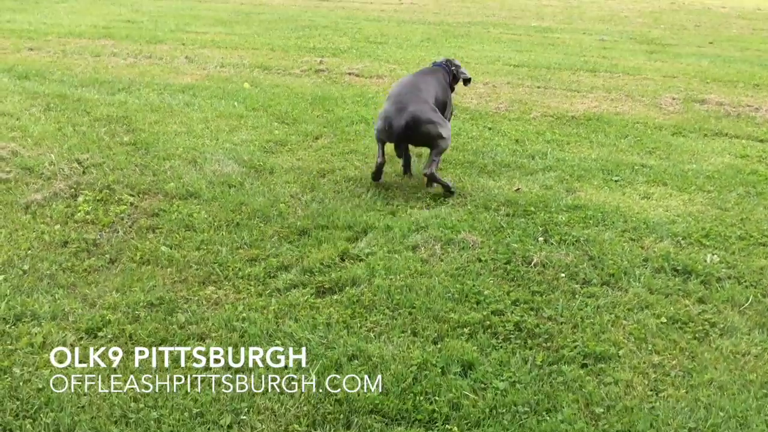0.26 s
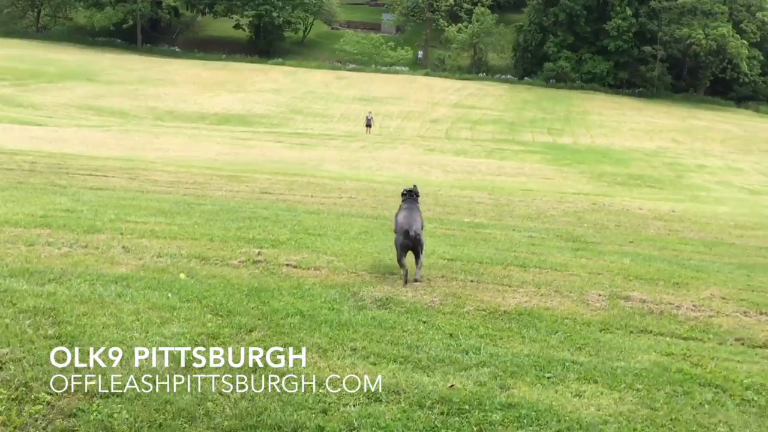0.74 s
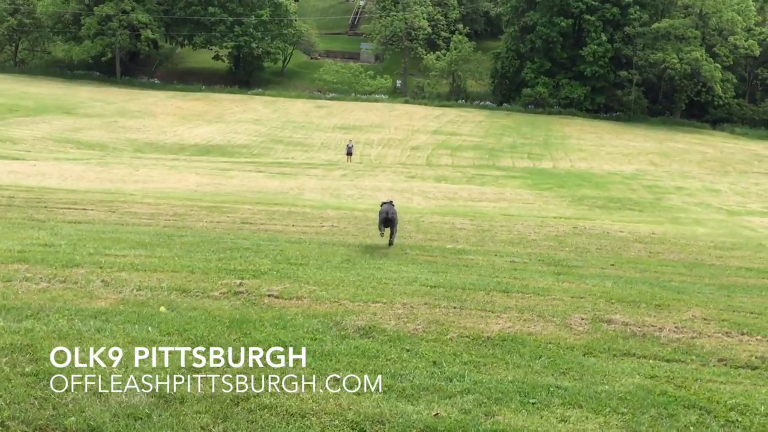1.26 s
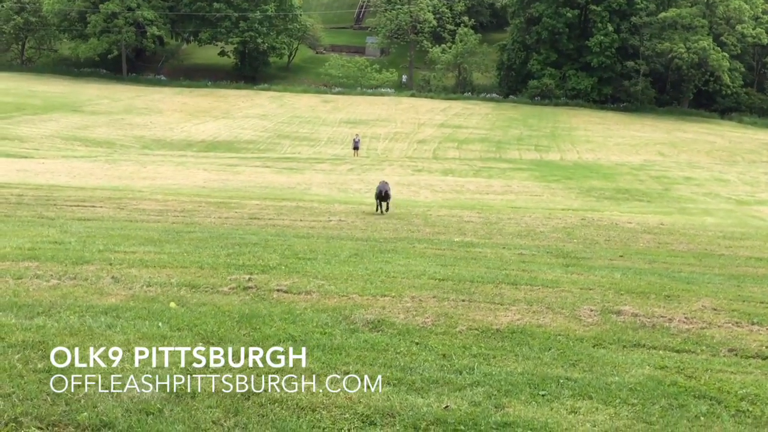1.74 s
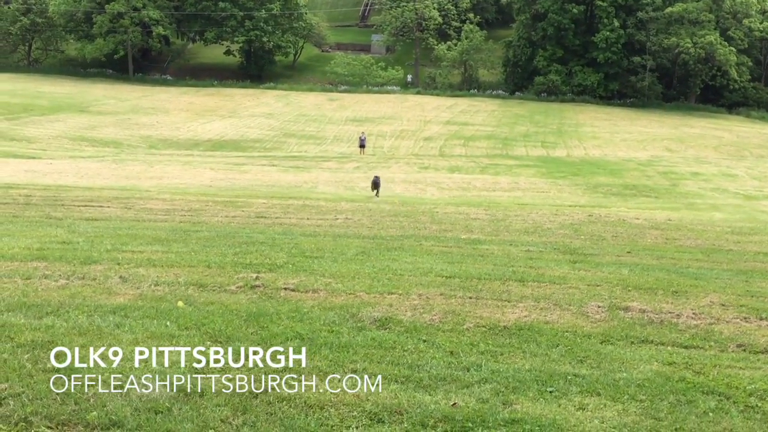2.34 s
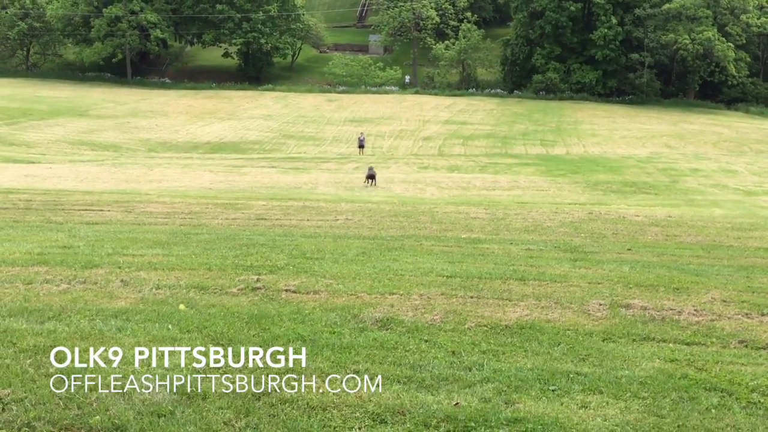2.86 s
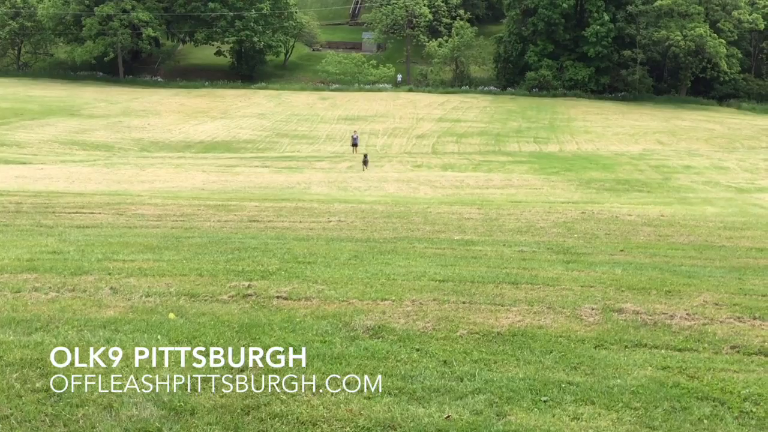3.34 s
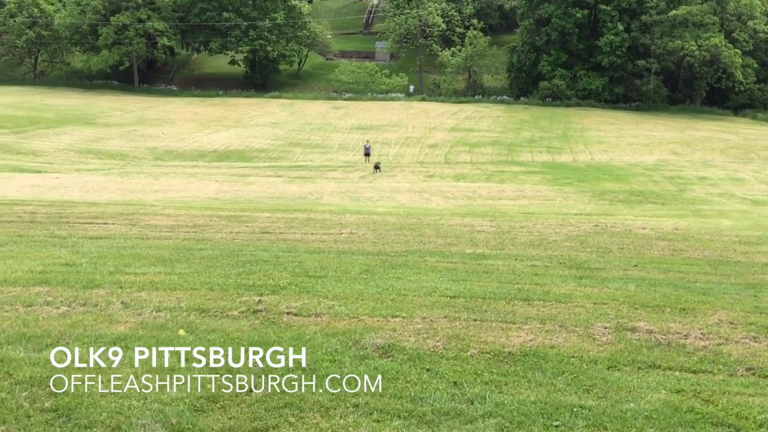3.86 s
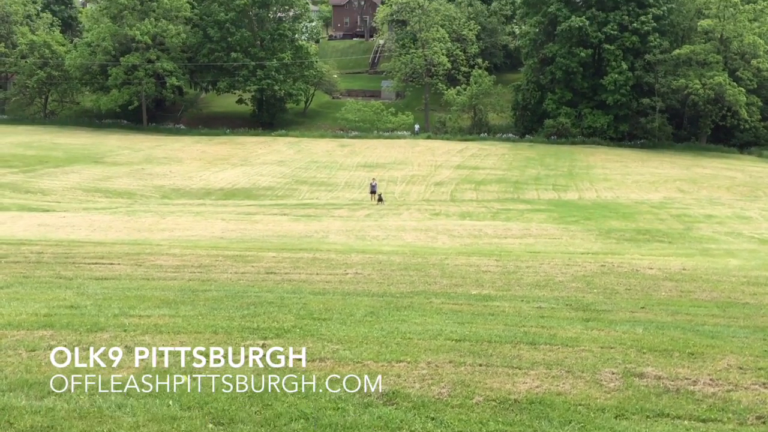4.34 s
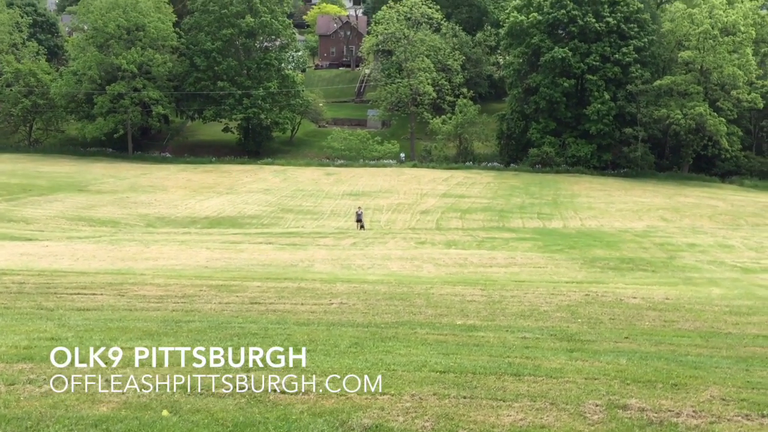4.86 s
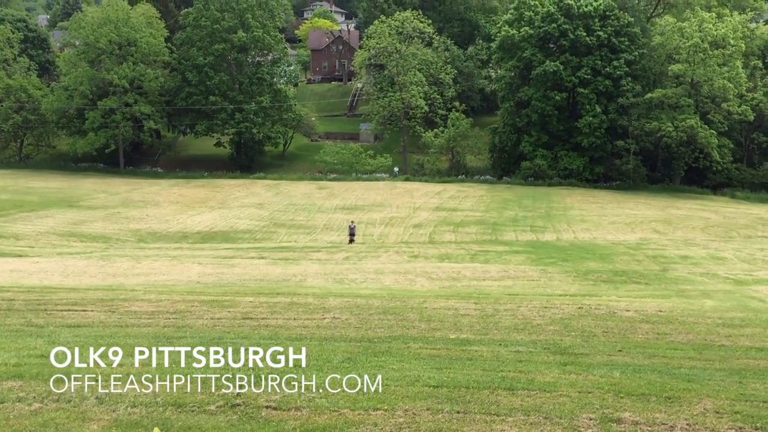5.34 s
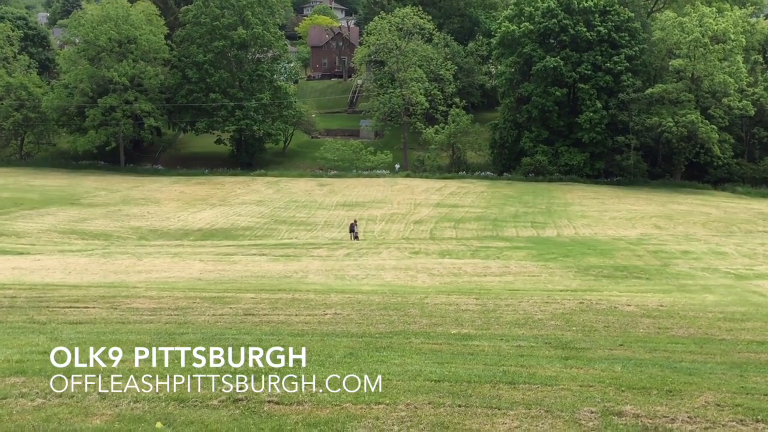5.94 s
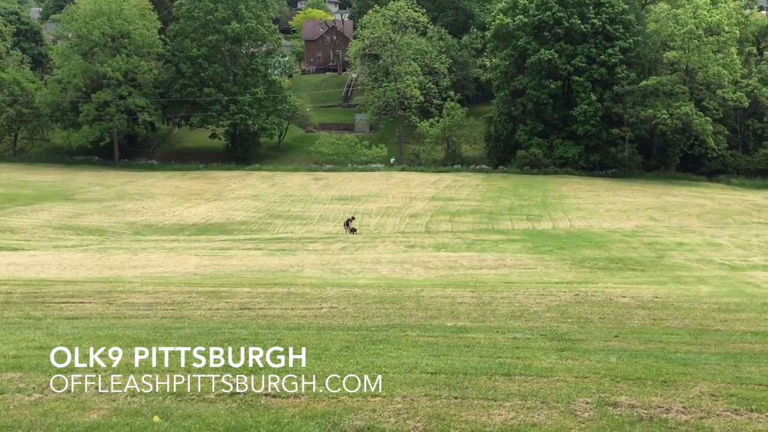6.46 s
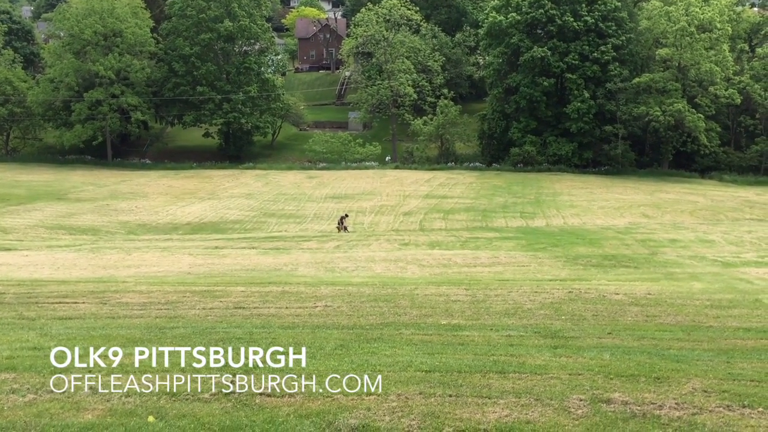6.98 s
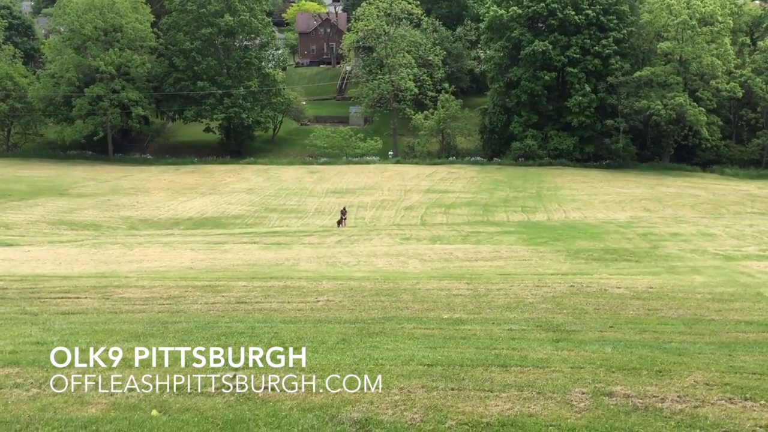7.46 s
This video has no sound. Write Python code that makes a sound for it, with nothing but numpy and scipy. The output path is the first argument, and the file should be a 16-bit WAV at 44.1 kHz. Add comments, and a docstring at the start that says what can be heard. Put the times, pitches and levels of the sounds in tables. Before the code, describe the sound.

A dog scuffs off through grass with tinkling tags and fading thuds, under constant insect buzzing, distant whistles, bright rolling birdsong and light wind rumble.

```python
"""A mown field ringed by trees, heard from the middle: cicadas drone as beating tones and coloured noise.
Light wind rumbles on the microphone as low noise. Close by, a dog bolts through the grass and runs off:
crackling noise for the blades, low thuds for the gallop, decaying sine modes for its jingling collar tags.
A wren sings four quick phrases of gliding tones, smeared by leaves; farther off, among the trees,
other birds whistle, twitter and coo with a diffuse echo."""
import sys
import numpy as np
from scipy import signal
from scipy.fft import rfft, irfft, next_fast_len
from scipy.io import wavfile
from scipy.ndimage import uniform_filter1d, map_coordinates

SR = 44100
rng = np.random.default_rng(int(sys.argv[2]) if len(sys.argv) > 2 else 0)


def digitize_waveform(pressure):
    """Quantize a signal to 16-bit integers and store it at the path in sys.argv[1].

    Rows of a 2-D input are taken as channels; values are limited to [-1, 1].
    """
    field = np.atleast_2d(pressure).T
    bounded = np.clip(field, -1, 1)
    quanta = np.round(bounded * 32767).astype(np.int16)
    wavfile.write(sys.argv[1], SR, quanta)


N = 340310  # length in samples

# Spectra give relative density; the noise made from them is scaled to rms 1.
# distant mass of droning cicadas: f/Hz, level/dB
DRONE_SPECTRUM = [(600, -66), (750, -43), (850, -24), (1000, -24), (1150, -12), (1250, -5.5), (1335, -0.5),
                  (1430, -7.5), (1500, -12.5), (1600, -20), (1680, -22.5), (1850, -29.5), (2400, -40.5),
                  (3200, -69)]
# higher, hissing cicadas: f/Hz, level/dB
HISS_SPECTRUM = [(2800, -36), (3300, -18.5), (3800, -9), (4400, -6), (4900, -10.5), (5300, -3), (5800, 0),
                 (6200, -1.5), (6700, -8), (7400, -21.5), (9000, -27), (10500, -43)]
# strength of the hiss, before a small trim: t/s, level/dB
HISS_LEVEL = [(0.1, -59.5), (1.33, -58.5), (1.58, -61), (4.47, -59), (7.6, -59)]
# soft rush of the open air: f/Hz, level/dB
AIR_SPECTRUM = [(20, 0.5), (150, 2), (300, -2.5), (500, -5), (700, -4.5), (2000, -3), (3100, -11.5),
                (8000, -18.5), (10500, -25), (14500, -26), (15700, -31.5)]
# wind rumble on the microphone: f/Hz, level/dB
RUMBLE_SPECTRUM = [(15, -42), (30, -18.5), (52, 1.5), (100, 0.5), (170, -4.5), (240, -14.5), (350, -32.5),
                   (700, -51.5)]
# strength of the breeze, before trim and flutter: t/s, level/dB
WIND_LEVEL = [(0.0, -62), (3.11, -61), (3.37, -65), (6.06, -66), (6.28, -72), (6.77, -64), (7.35, -71),
              (7.72, -73.5)]
# eddies that hit the microphone: centre t/s, length/s, level/dB
BUFFETS = [(6.79, 0.093, -51.5), (7.08, 0.068, -54), (7.145, 0.024, -45.5), (7.34, 0.03, -48)]
# low thump of those eddies: f/Hz, level/dB
THUMP_SPECTRUM = [(15, -21), (35, -8), (55, 13), (90, -9), (200, -34), (500, -74)]
# paws tear through the grass: centre t/s, length/s, level/dB
SCUFFS = [(.155, 0.076, -65.5), (0.322, 0.088, -50), (.695, 0.092, -61.5), (1.06, 0.072, -76),
          (3.06, .07, -70.5), (4.297, 0.075, -80)]
# rustling blades: f/Hz, level/dB
BLADE_SPECTRUM = [(100, -13), (700, -3.5), (2200, 4.5), (4000, -7), (6000, 4), (10500, -3),
                  (13500, 3), (15700, -2.5)]
# turf under the gallop: f/Hz, level/dB
TURF_SPECTRUM = [(60, -10), (220, 2), (380, 0.5), (520, -6), (700, 1), (1500, -10), (5000, -27), (9000, -46)]
# the collar is shaken and its tags strike: t/s, relative level/dB, hardness 0-1, ring f/Hz
JINGLES = [(.155, -54, .2, 9440), (.365, -62, 0.2, 9500), (0.542, -61, .3, 9400), (.702, -55.5, .8, 9520),
           (1.05, -46, 0.1, 9340), (1.461, -58, .15, 9400), (2.148, -54.5, 0.2, 9240),
           (2.601, -47, 0.8, 9250), (2.924, -54.5, .2, 9270), (3.054, -62, 0.2, 9510),
           (4.06, -57, 0.2, 9270), (5.986, -68.5, .1, 9550)]
# ringing modes of the tags: ratio to the ring f, relative level/dB, t60/s
TAG_MODES = [(0.846, -30.5, .12), (.99, -3.5, 0.097), (1, 2.5, 0.12), (1.017, -6, .08), (1.036, -11, 0.15),
             (1.352, -24, 0.12), (1.56, -26.5, .13)]
# thin, faint buzzes: centre t/s, length/s, level/dB, f/Hz
BUZZES = [(1.832, .2, -73, 7170), (5.05, .35, -78.5, 8480)]
# a far bird's slurred whistles: t/s, length/s, pitch f/Hz, final fall f/Hz, relative level/dB
WHISTLES = [(2.165, 0.18, 2352, 45, -54.5), (2.841, 0.2, 2326, 80, -52), (3.7, .19, 2334, 121, -59),
            (4.637, 0.14, 2450, 160, -66.5)]
# bouts of faint twittering: t/s, length/s, pitch f/Hz, relative level/dB
TWITTERS = [(3.41, .45, 2790, -78), (3.986, .15, 2680, -69), (6.68, .1, 2400, -70), (6.917, .33, 2306, -73)]
# one falling coo: length/s, start f/Hz, middle f/Hz, end f/Hz
COO = (0.17, 685, 622, 586)
# decay of the echo from the trees: f/Hz, t60/s
TREE_DECAY = [(300, 1), (2500, 0.81), (10000, 0.37)]
# the wren's syllables: t/s into the phrase, length/s, start f/Hz, middle f/Hz, end f/Hz, relative level/dB
PHRASE = [(-.002, .054, 1915, 2150, 2370, -8), (.045, .023, 2380, 2480, 2520, -5),
          (.083, .035, 3300, 2677, 2640, .5), (0.138, .036, 3960, 4280, 4540, -11.5),
          (.188, .038, 3300, 3480, 3980, -5), (.256, .029, 3350, 2470, 1900, -4)]
# whole phrases of the wren: t/s, relative level/dB
PHRASES = [(4.374, -49.5), (4.766, -47.5), (5.154, -46), (5.544, -45.5)]
# the song opens with only the last syllable of a phrase: phrase start t/s, relative level/dB
OPENING = (3.99, -52.5)

DRONE_DB, DRONE_DRIFT_DB = -42, 0.23  # gain of the drone mix, and its small random drift
SPRING_BACK_S, SPRING_LOSS_DB = 0.099, 14  # bent blades flick back after each scuff, ever weaker
BOLT_S, STRIDE_S, THUD_S = 0.314, 0.372, 0.085  # first push, time between pushes, length of each
THUD_DB, RECEDE_DB = -65.5, 3  # first push against the turf, and the loss with each stride away
REBOUND_S, REBOUND_LOSS_DB = 0.047, 15  # shortest rebound gap of the tags; loss each time
SCOOP_HZ, SCOOP_S, SWELL_DB = 168, 0.02, 14  # whistle: initial scoop, its time constant, total swell
ACCENT_DB, ACCENT_S = 5, 0.024  # whistle: short accent, centred this long before the end
TWITTER_NOTE_S, TWITTER_SPREAD = 0.045, 0.03  # length of a note; scatter of pitch as a share
COO_FIRST_S, COO_EVERY_S, COO_DB = 5.42, 0.805, -74  # evenly repeated coos from the wood
RISE_DB_PER_OCTAVE = 11  # a bird's voice gains strength as its pitch climbs
TOP_HZ = 15740  # upper band limit of the recorder


def amp(db):
    """Decibels to gain."""
    return 10 ** (np.asarray(db) / 20)


def unit(x):
    """Scale to rms 1."""
    return x / np.sqrt(np.mean(x ** 2) + 1e-20)


def along(points, hz):
    """Interpolate (f/Hz, value) points on a log frequency axis."""
    f, v = np.transpose(points)
    return np.interp(np.log(hz + 1), np.log(f + 1), v)


def curves(rows):
    """One value per sample for each column after the time."""
    s, *cols = np.transpose(rows)
    return [np.interp(np.arange(N) / SR, s, c) for c in cols]


def wobble(rate):
    """A smooth random curve, rate knots a second."""
    coarse = np.arange(0, N + 64, 64)
    knots = rng.standard_normal(int(N * rate / SR) + 4)
    values = map_coordinates(knots, [coarse * rate / SR], mode="nearest")
    return np.interp(np.arange(N), coarse, values)


def filtered(x, response):
    """Multiply the spectrum of x by a response of frequency."""
    m = next_fast_len(N + SR // 2)
    return irfft(rfft(x, m) * response(np.fft.rfftfreq(m, 1 / SR)), m)[:N]


def rush(spectrum, patchy_db):
    """Coloured noise of rms 1 with patches of random gain in time and frequency."""
    z = signal.stft(rng.standard_normal(N), nperseg=512)[2]
    field = uniform_filter1d(rng.standard_normal(z.shape), size=5, axis=0)
    field = uniform_filter1d(field, size=16, axis=1)
    noise = signal.istft(z * amp(patchy_db * unit(field)), nperseg=512)[1][:N]
    return unit(filtered(noise, lambda hz: amp(along(spectrum, hz))))


def swells(rows):
    """A gain curve of bell-shaped swells (centre t/s, length/s, level/dB)."""
    t = np.arange(N) / SR
    return sum(amp(db) * np.exp(-(2 * (t - s) / length) ** 2) for s, length, db in rows)


def add(track, s, sound):
    """Mix a sound into a track at time s."""
    part = track[max(0, round(s * SR)):][:len(sound)]
    part += sound[:len(part)]


def rebounds(gap_s, loss_db, count):
    """A contact and its ever weaker repeats: (delay/s, level/dB)."""
    return [(k * gap_s, -k * loss_db) for k in range(count)]


def singers(centre_hz, spread_hz, waver_hz, swell_db, count):
    """The nearer cicadas: each abdomen rings at its own wavering pitch, and the tones beat together."""
    total = np.zeros(N)
    for offset in np.linspace(-1, 1, count):
        hz = centre_hz + spread_hz * offset + waver_hz * (wobble(1.5) + wobble(35))
        cycles = np.cumsum(hz) / SR + rng.random()
        total += amp(swell_db * wobble(1.23)) * np.sin(2 * np.pi * cycles)
    return unit(total)


def cicadas():
    """Countless far voices blur into a drone behind the nearer ones; a second kind hisses above them."""
    near = singers(centre_hz=1332, spread_hz=42, waver_hz=17, swell_db=1.5, count=16)
    drone = amp(-0.72) * rush(DRONE_SPECTRUM, patchy_db=1.0) + amp(-6.0) * near
    drone_gain = amp(DRONE_DB + DRONE_DRIFT_DB * wobble(1.864))
    hiss_db, = curves(HISS_LEVEL)
    hiss = amp(hiss_db + 1.38) * rush(HISS_SPECTRUM, patchy_db=1.32)
    return drone_gain * drone + hiss


def wind():
    """A breeze rumbles on the microphone, with a few low thumps, over the soft rush of the open air."""
    wind_db, = curves(WIND_LEVEL)
    flutter_db = 1.4 * wobble(14)
    rumble = amp(wind_db + 2.5 + flutter_db) * rush(RUMBLE_SPECTRUM, patchy_db=1.8)
    thumps = swells(BUFFETS) * rush(THUMP_SPECTRUM, patchy_db=1.5)
    air = amp(-68) * rush(AIR_SPECTRUM, patchy_db=2.5)
    return rumble + thumps + air


def grass():
    """Blades crackle under the paws and spring back; each gallop stride thuds on the turf, farther away."""
    crackle = unit(amp(3.5 * wobble(500) + 1.5 * wobble(70)))
    blades = rush(BLADE_SPECTRUM, patchy_db=1.5)
    turf = rush(TURF_SPECTRUM, patchy_db=1.5)
    scuffs = [(s + delay, length, db + rel_db) for s, length, db in SCUFFS
              for delay, rel_db in rebounds(SPRING_BACK_S, SPRING_LOSS_DB, count=3)]
    strides = [(BOLT_S + delay, THUD_S, THUD_DB + rel_db)
               for delay, rel_db in rebounds(STRIDE_S, RECEDE_DB, count=4)]
    return crackle * (swells(scuffs) * blades + swells(strides) * turf)


def jostles(until_s, db, count):
    """Faint extra touches of the tags while the dog runs, at random times, in the form of JINGLES rows."""
    return [(until_s * when, db - 6 * soft, 0.1, 9250 + 300 * tag)
            for when, soft, tag in rng.random((count, 3))]


def collar():
    """Small metal tags ring anew on every contact and rebound; hard contacts add a tick and upper modes."""
    track, t = np.zeros(N), np.arange(SR // 5) / SR
    ratio, level, t60 = np.transpose(TAG_MODES)[:, :, None]
    upper = np.arange(len(TAG_MODES))[:, None] >= len(TAG_MODES) - 2  # the two highest modes
    decay = np.exp(-np.log(1000) * t / t60) * (1 - np.exp(-t / 0.0013))
    for s, db, hardness, ring_hz in JINGLES + jostles(until_s=4.8, db=-68.5, count=24):
        for delay, rel_db in rebounds(REBOUND_S, REBOUND_LOSS_DB, count=3):
            force = hardness * amp(rel_db)
            strength = amp(level + rng.normal(0, 2.8, ratio.shape) + 9 * force * upper)
            cycles = ring_hz * ratio * t + rng.random(ratio.shape)
            ring = np.sum(strength * decay * np.sin(2 * np.pi * cycles), axis=0)
            tick = 0.55 * force * np.exp(-t / 0.008) * rng.standard_normal(len(t))
            contact_s = s + delay * rng.uniform(1.0, 1.2)
            add(track, contact_s, amp(db + rel_db - 2.0) * (ring + tick))
    # thin out everything below the ring
    return filtered(track, lambda hz: amp(along([(2000, -42), (7500, 0)], hz)))


def buzzes():
    """Brief high buzzes, narrow bands of noise, swell and fade above the chorus."""
    total = np.zeros(N)
    for s, length, db, hz in BUZZES:
        band = [(0.93 * hz, -35), (hz, 0), (1.15 * hz, -35)]
        total += swells([(s, length, db)]) * rush(band, patchy_db=2)
    return total


def notes(rows, edge):
    """Pure bird notes glide through three pitches, stronger when higher; edge = share spent fading."""
    track = np.zeros(N)
    for s, length, start, middle, end, db in rows:
        u = np.linspace(0, 1, max(8, int(length * SR)))
        glide = np.polyfit([0, 0.5, 1], [start, middle, end], 2)
        hz = np.polyval(glide, u) * (1 + rng.normal(0, 0.0037))
        fade = signal.windows.tukey(len(u), np.clip(edge, 0.1, 1))
        shape = fade * amp(RISE_DB_PER_OCTAVE * np.log2(hz / middle))
        tone = np.sqrt(2) * np.sin(2 * np.pi * np.cumsum(hz) / SR)
        add(track, s, amp(db + rng.normal(0, 0.91)) * shape * tone)
    return track


def tree_echo(x):
    """The edge of the wood scatters a diffuse tail back over the field, its treble dying sooner."""
    hz, t, z = signal.stft(rng.standard_normal(SR), SR, nperseg=256)
    fade = amp(-60 * t / along(TREE_DECAY, hz)[:, None])
    tail = signal.istft(z * fade, SR, nperseg=256)[1]
    return signal.fftconvolve(x, tail / np.linalg.norm(tail))[:N]


def whistler():
    """Each whistle scoops up, swells, and droops just as it is loudest."""
    track = np.zeros(N)
    for s, length, pitch_hz, fall_hz, db in WHISTLES:
        u = np.linspace(0, 1, int(length * SR))
        hz = pitch_hz - SCOOP_HZ * np.exp(-u * length / SCOOP_S) - fall_hz * u ** 3
        accent_db = ACCENT_DB * np.exp(-((1 - u) * length / ACCENT_S - 1) ** 2 * 2)
        shape = amp(db + SWELL_DB * (u - 1) + accent_db) * signal.windows.tukey(len(u), 0.2)
        add(track, s, np.sqrt(2) * shape * np.sin(2 * np.pi * np.cumsum(hz) / SR))
    return track


def twitters():
    """Runs of short notes, each sliding at random about the pitch of its bout."""
    rows = []
    for s, length, hz, db in TWITTERS:
        for delay in np.arange(0, length, TWITTER_NOTE_S):
            slide = rng.normal() + rng.normal() * np.linspace(-0.5, 0.5, 3)
            pitches = hz * (1 + TWITTER_SPREAD * slide)
            rows.append((s + delay, TWITTER_NOTE_S, *pitches, db))
    return notes(rows, edge=0.9)


def far_birds():
    """Whistles, twitters and coos from within the trees, each trailing its echo."""
    calls = whistler() + twitters()
    coos = notes([(COO_FIRST_S + k * COO_EVERY_S, *COO, COO_DB) for k in range(3)], edge=0.48)
    echo = tree_echo(amp(-4.5) * calls + amp(-11.5) * coos)
    return amp(-1.0) * calls + coos + echo


def syllables(s, db, rows):
    """The notes of a phrase sung at time s and level db."""
    return [(s + delay, length, start, middle, end, db + rel_db)
            for delay, length, start, middle, end, rel_db in rows]


def foliage(x, spread_s, share):
    """Nearby leaves and trunks scatter a short smear that frays each note."""
    t = np.arange(SR // 8) / SR
    scatter = rng.standard_normal(len(t)) * np.exp(-t / spread_s)
    return x + share * signal.fftconvolve(x, scatter / np.linalg.norm(scatter))[:N]


def wren():
    """One falling chirp, then a rolling phrase of gliding tones repeated, growing louder."""
    song = syllables(*OPENING, PHRASE[-1:])
    for s, db in PHRASES:
        song += syllables(s, db, PHRASE)
    voice = foliage(notes(song, edge=0.61), spread_s=0.022, share=0.33)
    return amp(0.06) * voice + amp(-16.0) * tree_echo(voice)


def scene():
    """Everything heard from the middle of the field, on one microphone."""
    dog = grass() + collar()
    birds = far_birds() + wren()
    return (cicadas() + wind() + dog + buzzes() + birds)[None]


def record(dry):
    """The recorder keeps nothing above its band limit."""
    return filtered(dry[0], lambda hz: hz < TOP_HZ)[None]


dry = scene()
out = record(dry)
digitize_waveform(out)
```